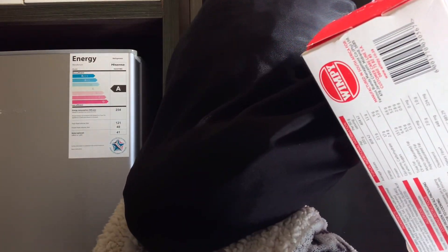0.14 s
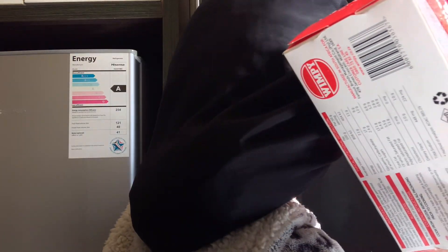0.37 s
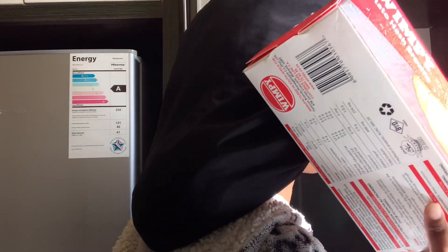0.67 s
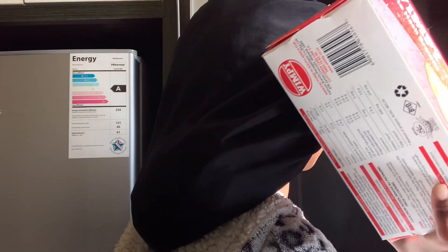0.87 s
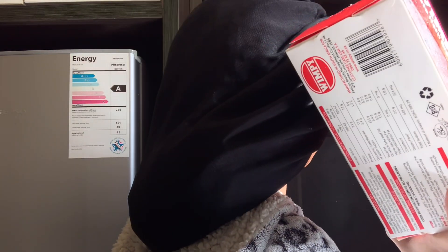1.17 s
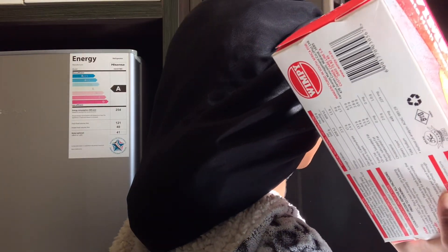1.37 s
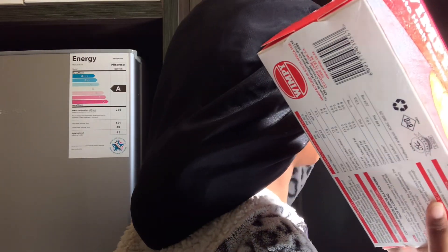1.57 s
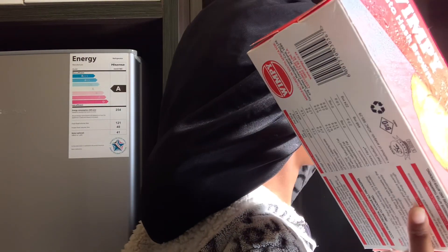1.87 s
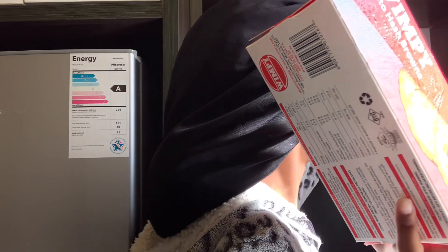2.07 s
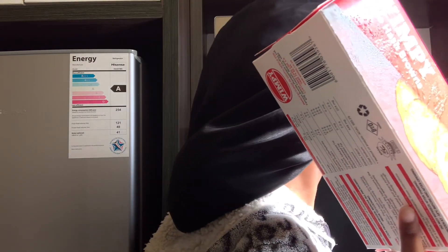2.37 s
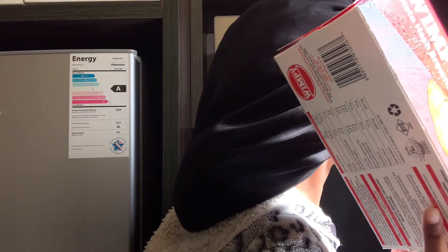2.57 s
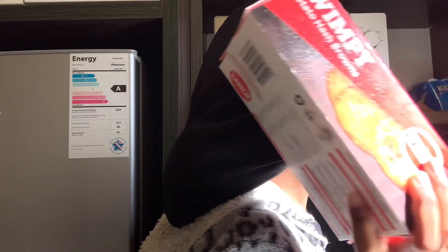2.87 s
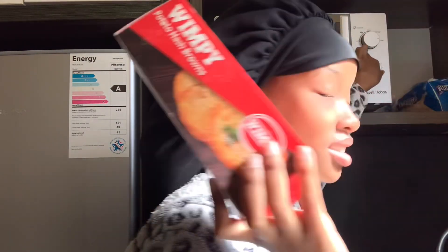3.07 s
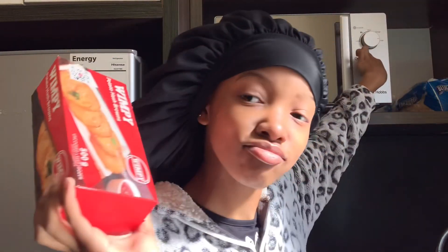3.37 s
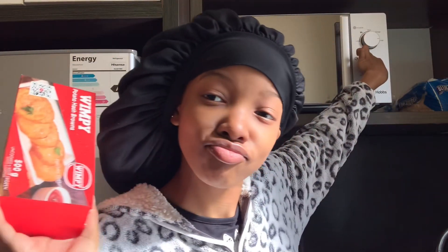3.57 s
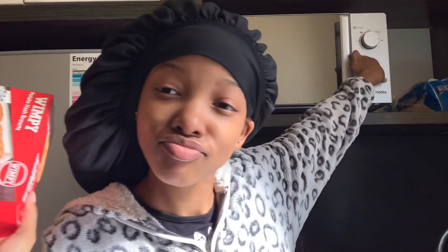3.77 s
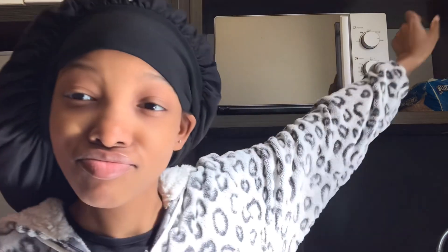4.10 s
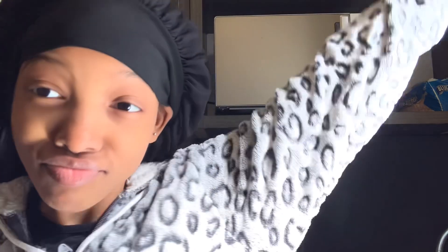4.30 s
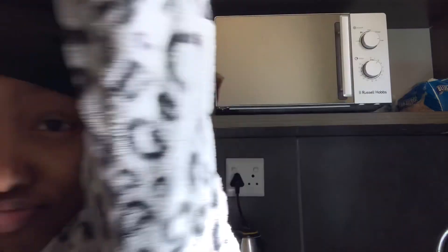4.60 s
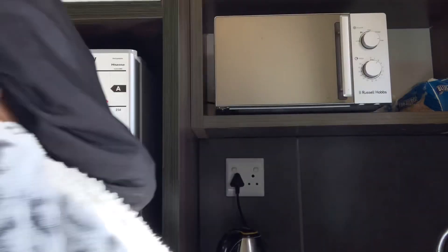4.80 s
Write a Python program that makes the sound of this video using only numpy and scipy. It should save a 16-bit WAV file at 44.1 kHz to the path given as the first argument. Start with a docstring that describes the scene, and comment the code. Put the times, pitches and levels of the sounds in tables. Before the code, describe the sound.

A dish clatters onto a microwave turntable, the door thuds shut with a boom, a dial clicks, and the oven starts humming steadily.

```python
"""A microwave oven in a hard-walled kitchen

A dish rattles onto the turntable and slides, the door's latch knocks and the door booms shut, the dial clicks:
each blow is a burst of reverberant noise plus decaying modes. At switch-on a surge shakes the case, then
the transformer hums and buzzes in steady partials while the fan's blade tone climbs through duct resonances.
A sleeve brushes near the microphone as shaped noise; a fridge drones in beating lines over still air.
"""
import sys
import numpy as np
from scipy import signal
from scipy.fft import rfft, irfft, next_fast_len
from scipy.io import wavfile

SR = 44100
rng = np.random.default_rng(int(sys.argv[2]) if len(sys.argv) > 2 else 0)


def waveform_to_disk(signal):
    """Save audio, clipped to [-1, 1], as 16-bit WAV at the path in sys.argv[1]."""
    frames = np.transpose(np.atleast_2d(signal))
    scaled = np.clip(frames, -1, 1) * 32767
    samples = np.round(scaled).astype(np.int16)
    wavfile.write(sys.argv[1], SR, samples)


N = 217986
TIME = np.arange(N) / SR  # s

# Blows: (time [s], clack level [dB], ring level [dB], clack tilt [dB/octave], favoured frequency [Hz])
# the dish lands and rocks
DISH_BLOWS = [(.367, -24, -11.5, 1.5, 795), (.385, -28, -22, -4, 446), (.443, -23.5, -32.5, -1, 1700),
              (.475, -23.5, -20.5, -5.5, 505), (.505, -41, -19, -5, 755), (.516, -25, -29, -1, 1060),
              (.527, -33.5, -19.5, -9, 540), (.924, -37, -66.5, -.5, 1700), (1.059, -53, -80, 0, 1680)]
# latch hooks, then the door on its frame: columns as for the dish
DOOR_BLOWS = [(1.654, -27.5, -40.5, -1, 700), (1.682, -25, -22, -1, 720), (1.703, -24, -27, 0.5, 262),
              (1.711, -20.5, -23, -0.5, 1170), (1.716, -18, -25.5, 1, 1900),
              (1.726, -18.5, -14.5, -1.5, 288), (1.741, -40.5, -25, -1, 470), (1.751, -26, -19, -1, 356),
              (1.774, -32, -20, 0.5, 478)]
# the timer dial: columns as for the dish
DIAL_BLOWS = [(2.127, -41, -34.5, -1.7, 1040), (2.164, -58.5, -53, -1.3, 2000),
              (2.200, -52.5, -37, -2.5, 1050), (4.281, -53, -57, 2, 2000)]
# the timer switch closing: columns as for the dish
SWITCH_BLOWS = [(2.398, -41.5, -24.5, -2, 805), (2.436, -48.5, -32.5, 0.5, 984)]

# Modes rung by a blow on the dish, the lowest being the case rocked as the dish lands: (frequency [Hz],
# relative level [dB], decay time T60 [s])
DISH_MODES = [(101.5, -7, 1.9), (219, -4.5, 1.3), (372, 0, 0.41), (382.3, -9, 0.86), (411.5, 2.5, 0.88),
              (530.5, 4, 0.35), (544.4, -1.5, 0.4), (573, -7, 0.9), (585, -19, 0.48), (688, -5.5, 0.39),
              (796, 2.5, 0.45), (788, -4, 0.79), (822, -4, 0.28), (1117, -18, 0.98), (1700, 1.5, 0.49),
              (1640, -22, 0.23), (2250, -20, 0.27), (3030, -14, 0.62), (3400, -14, 0.45), (5000, -27, .3)]
# modes of the door: (frequency [Hz], relative level [dB], decay time T60 [s])
DOOR_MODES = [(255, 1, 0.41), (290, 0, .45), (346, -24, 0.33), (366.7, 3, 0.65), (391.8, 2, 0.33),
              (410, -8.5, 0.59), (450, -2, .65), (473, 1.5, 0.27), (575, 1.5, 0.56), (586, -13.5, 0.93),
              (566, -15, 0.3), (740, -12, 0.19), (810, -21.5, 0.71), (860, -10.5, .36), (1173, -9, 0.89),
              (1370, -15.5, .35), (1610, -5.5, 0.21), (2340, -5, .27)]
# modes of the dial: (frequency [Hz], relative level [dB], decay time T60 [s])
DIAL_MODES = [(860, -10.5, .3), (1000, 0, 0.21), (1056, 6, 0.31), (2100, -7, 0.69)]
# modes of the switch: (frequency [Hz], relative level [dB], decay time T60 [s])
SWITCH_MODES = [(721, -7, 0.12), (766, -5.5, 0.14), (840, -6.5, 0.18), (870, -6.5, 0.27), (925, -9.5, 0.14),
                (1090, -7.5, 0.39)]

# Unpitched part of a blow on the dish: (frequency [Hz], relative density [dB per Hz])
DISH_CLACK = [(40, -28), (70, -21), (120, -4), (300, -6.5), (550, 9.5), (800, 7), (1150, 0), (2000, -1.5),
              (3100, -4), (4500, -11.5), (7000, -16.5), (11000, -21), (16000, -15.5)]
# unpitched part of a blow on the door: (frequency [Hz], relative density [dB per Hz])
DOOR_CLACK = [(25, -31.5), (55, 5), (150, 7), (350, 4.5), (600, 4), (1200, 3), (2200, -1), (3800, -5),
              (5500, -13), (7500, -20.5), (11000, -20), (16000, -17)]
# unpitched part of a blow on dial or switch: (frequency [Hz], relative density [dB per Hz])
DIAL_CLACK = [(60, 5.5), (400, -1.5), (1000, 6), (2200, -6.5), (5000, -19), (10000, -37.5), (16000, -26)]

# Close pairs of modes of case and cupboard: (mean frequency [Hz], split [Hz], level [dB], T60 [s])
BOOM_PAIRS = [(54.4, 11, -19, 0.54), (90.4, 10, -22, 1), (145.5, 6.9, -14.5, 1), (181.1, 5.75, -15, 1.0),
              (229, 9.4, -22, 0.58), (285.8, 7.5, -25, 0.64)]
# partials of the booming case: (frequency [Hz], relative level [dB], left-right difference [dB])
CASE_PARTIALS = [(138, 1, -3.5), (198, -20, 9), (102.4, -18.5, -4)]
# hum of the transformer core: (frequency [Hz], level [dB], left-right difference [dB])
MAINS_HUM = [(50.2, -58, -1), (100, -35, -4), (150.1, -55, 14), (200.1, -56, -10)]
# buzz of the core at its onset: (frequency [Hz], level [dB], left-right difference [dB])
CORE_BUZZ = [(298.3, -48.5, -7), (596.5, -56, -9)]
# resonances of the air duct: (frequency [Hz], width [Hz], level [dB])
DUCT_RESONANCES = [(188, 5.3, -50.5), (212.2, 6.4, -39.5)]
# air moved by the fan: (frequency [Hz], relative density [dB per Hz])
DRAUGHT_SPECTRUM = [(60, -16), (110, -12.5), (170, -3.5), (300, 2), (450, 0), (1100, -3), (1500, -12),
                    (2200, -12.5), (4000, -29.5), (7000, -34), (15000, -54)]

# Strokes of the sleeve: (time [s], length [s], level [dB], treble tilt [dB/octave])
SLEEVE_STROKES = [(3.03, .25, -57, 1.5), (3.76, .05, -66, 1), (4.151, .12, -68, 7), (4.264, .07, -51.5, 5),
                  (4.377, .08, -60.5, 3), (4.71, 0.11, -68.5, 3)]
# the one snap of the fleece: (time [s], level [dB])
FLEECE_SNAP = (3.999, -37.5)
# hiss of the fleece: (frequency [Hz], relative density [dB per Hz])
CLOTH_SPECTRUM = [(200, 5), (1000, -1.5), (3500, 6), (6500, -2), (10500, -14.5), (14500, -7.5), (16000, -3)]

# Fridge compressor: (frequency [Hz], level [dB], left-right difference [dB])
FRIDGE_LINES = [(61.1, -49, 0), (105, -58, -3), (122.3, -51, 3), (179.8, -54, 4), (183.6, -57, 7),
                (220.8, -60, 0), (348.6, -59, 6), (500.3, -58, -2), (631.8, -59, -8)]
# evenly spaced lines that beat as a fast throb: (frequency [Hz], relative level [dB], left-right [dB])
THROB_LINES = [(411.2, -57, 3), (426.35, -48.5, 0), (441.5, -49, 0), (456.65, -57, -3)]
# still air of the kitchen: (frequency [Hz], relative density [dB per Hz])
AIR_SPECTRUM = [(25, -11), (50, -8.5), (80, -9), (125, -4), (200, -9.5), (370, -10), (520, -16.5),
                (700, -14), (1150, -14.5), (1450, -21.5), (2200, -26.5), (3400, -32.5), (6700, -43.5),
                (11000, -62), (15500, -52)]

# Reflections from the walls of the oven's alcove: (delay [s], level [dB])
ALCOVE_ECHOES = [(.0017, -18), (.0039, -14.5), (.0062, -17), (.0094, -10.5)]
# reverberation of the kitchen: (frequency [Hz], decay time T60 [s])
ROOM_T60 = [(60, 0.77), (200, 1), (500, 0.66), (1000, 0.67), (2000, 0.61), (4000, 0.65), (7000, 0.54),
            (11000, 0.31), (16000, .3)]
# likeness of the sound at the two ports: (frequency [Hz], coherence [0 to 1])
COHERENCE = [(50, 0.94), (150, 0.62), (300, 0.35), (550, 0.091), (1000, 0.36), (3000, 0.035), (7000, 0.05),
             (12000, 0.38)]
# response of the microphone ports: (frequency [Hz], gain [dB])
MICROPHONE = [(20, -9.5), (32, -7.5), (45, -1), (6800, 1), (7700, -2), (8500, -32.5), (9400, -30.5),
              (10500, 1.5), (12000, 2.5), (16000, -5.5)]

LAG_S = 0.00035  # the left port hears later
SLAM_S, MAINS_ON_S, THROB_PEAK_S = 1.712, 2.41, 2.412
AIR_DB = -41.5
# lengths run from the onset to the start of the release
CHATTER_S, CHATTER_LENGTH_S, CHATTER_PER_S = .434, .14, 45
CHATTER_DB, CHATTER_SPREAD_DB, CHATTER_FADE_DB_PER_S, CHATTER_TILT_DB = -35, 3.5, 28, 0.6
SLIDE_S, SLIDE_RISE_S, SLIDE_LENGTH_S, SLIDE_FALL_S = 0.891, 0.02, 0.088, .035
SLIDE_DB, SLIDE_TILT_DB = -44, -1.9  # tilt per octave, as for chatter and snap
SURGE_S, SURGE_RISE_S, SURGE_LENGTH_S, SURGE_FALL_S = 2.399, 0.051, 0.085, 0.015
SURGE_DB, LINGER_DB, LINGER_T60_S = -16.5, -12, 0.65  # the lingering boom is relative to the surge
FAN_TOP_HZ, FAN_RUN_UP_S = 212.34, .83  # final blade tone, time constant of the run-up
STROKE_RISE_S, STROKE_FALL_S, SNAP_TILT_DB = .055, .065, 8
KNEE, CEILING = .6, .9  # amplitude where rounding starts, and its limit
EDGE_HZ = 15900  # upper band limit


def dish():
    """Impact and friction: blows excite the modes of the dish and rock the case, its rim chatters, its foot
    scrapes."""
    struck = blows(DISH_BLOWS, DISH_MODES, DISH_CLACK, crack_db=3.5, crack_s=0.0047, rise_s=0.0014, alike=0.56)
    return (struck + chatter() + slide()) * pan(db=-1.0)


def chatter():
    """Repeated impact: ticks of the rim follow unevenly and weaken as the dish settles."""
    out = np.zeros((2, N))
    ticks = []
    for _ in range(5):
        echoes = alcove(clack(crack_db=14, crack_s=.004))
        ticks.append(colour(echoes, DISH_CLACK, CHATTER_TILT_DB))
    for k, (early, size) in enumerate(rng.uniform(-1, 1, (16, 2))):
        after_s = (k + .3 * early) / CHATTER_PER_S
        if after_s < CHATTER_LENGTH_S:
            level_db = CHATTER_DB + CHATTER_SPREAD_DB * size - CHATTER_FADE_DB_PER_S * after_s
            add(out, CHATTER_S + after_s, amp(level_db) * ticks[k % len(ticks)])
    return out


def slide():
    """Sliding friction: the foot of the dish scrapes the glass as a short swell of broadband noise."""
    scrape = amp(SLIDE_DB) * colour(diffuse(N), DISH_CLACK, SLIDE_TILT_DB)
    return envelope(TIME - SLIDE_S, SLIDE_RISE_S, SLIDE_LENGTH_S, SLIDE_FALL_S) * scrape


def door():
    """Impact: latch hooks and frame ring the modes of the door."""
    struck = blows(DOOR_BLOWS, DOOR_MODES, DOOR_CLACK, crack_db=6, crack_s=0.0082, rise_s=0.0018, alike=0.23)
    return struck * pan(db=-1.0)


def slam_boom():
    """Coupled modes: energy passes to and fro within each pair, so the boom swells, dips and returns."""
    t = np.maximum(TIME - SLAM_S - np.array([[LAG_S], [0]]), 0)
    out = np.zeros((2, N))
    for hz, split_hz, db, t60 in BOOM_PAIRS:
        beat = np.sin(np.pi * split_hz * t)
        carrier = np.sin(2 * np.pi * hz * t)
        out += np.sqrt(2) * amp(db - 60 * t / t60) * beat * carrier
    return out


def dial():
    """Impact: the clicks of the timer dial ring a few modes."""
    struck = blows(DIAL_BLOWS, DIAL_MODES, DIAL_CLACK, crack_db=10.0, crack_s=.008, rise_s=0.0028, alike=0.86)
    return struck * pan(db=-7.0)


def switch():
    """Impact: the closing timer switch rings its own modes with a soft clack."""
    struck = blows(SWITCH_BLOWS, SWITCH_MODES, DIAL_CLACK,
                   crack_db=-10.5, crack_s=.008, rise_s=0.0026, alike=0.3)
    return struck * pan(db=-7.0)


def transformer(ease_db_per_s=4, rise_s=0.022):
    """Magnetic vibration: a surge shakes the case, then the core hums, strongest at twice the mains rate."""
    since_surge = TIME - SURGE_S
    surge = envelope(since_surge, SURGE_RISE_S, SURGE_LENGTH_S, SURGE_FALL_S)
    linger_fall_s = LINGER_T60_S / np.log(1000)  # T60 to exponential time constant
    # a weaker boom lingers in the cupboard
    linger = amp(LINGER_DB) * envelope(since_surge, SURGE_RISE_S, SURGE_LENGTH_S, linger_fall_s)
    case = tones(CASE_PARTIALS, start_s=2.8, waver_db=3.5, waver_hz=8)
    boom = amp(SURGE_DB) * np.maximum(surge, linger) * case
    since_s = np.maximum(TIME - MAINS_ON_S, 0)
    hum = tones(MAINS_HUM, MAINS_ON_S, waver_db=.6, waver_hz=2.5)
    # the buzz eases as the filament warms
    buzz = amp(-ease_db_per_s * since_s) * tones(CORE_BUZZ, MAINS_ON_S, waver_db=1.5, waver_hz=1.3)
    return boom + np.minimum(since_s / rise_s, 1) * (hum + buzz)


def fan(octave_db=-14, draught_db=-47):
    """Blade passage and resonance: the tone climbs with speed, swelling in the duct; the draught grows too."""
    speed = np.tanh(np.maximum(TIME - MAINS_ON_S, 0) / FAN_RUN_UP_S)  # fraction of full speed
    blade_hz = FAN_TOP_HZ * speed
    power = np.zeros(N)
    for hz, width_hz, db in DUCT_RESONANCES:
        power += amp(db) ** 2 / (1 + (2 * (blade_hz - hz) / width_hz) ** 2)
    gain = speed * np.sqrt(power)
    turn = 2 * np.pi * (np.cumsum(blade_hz) / SR - blade_hz * np.array([[LAG_S], [0]]))
    tone = np.sqrt(2) * gain * (np.sin(turn) + amp(octave_db) * np.sin(2 * turn))
    return tone + amp(draught_db) * speed * diffuse(N, DRAUGHT_SPECTRUM)


def sleeve(grain_db=1.0, snap_s=0.0018, direct=0.73):
    """Fibre friction: fleece hisses in uneven catches and snaps once; being near, both ports share much."""
    out, t = np.zeros((2, N)), TIME[:SR]
    for s, length_s, db, tilt_db in SLEEVE_STROKES:
        noise = evened(diffuse(SR) + direct * diffuse(SR)[0])
        hiss = colour(noise, CLOTH_SPECTRUM, tilt_db)
        add(out, s, amp(db) * envelope(t, STROKE_RISE_S, length_s, STROKE_FALL_S) * hiss)
    s, db = FLEECE_SNAP
    snap = colour(diffuse(SR), CLOTH_SPECTRUM, SNAP_TILT_DB)  # mostly top treble
    add(out, s, amp(db) * np.exp(-t / snap_s) * snap)
    return out * amp(grain_db * drift(hz=70))


def fridge(throb_db=-0.1):
    """Beating: the compressor drones in steady lines, and evenly spaced lines sum to a fast throb."""
    drone = tones(FRIDGE_LINES, start_s=0, waver_db=3.0, waver_hz=3)
    throb = amp(throb_db) * tones(THROB_LINES, THROB_PEAK_S, waver_db=2.5, waver_hz=1.81)
    return drone + throb


def still_air():
    """Diffuse field: steady coloured noise of the quiet kitchen."""
    return amp(AIR_DB) * diffuse(N, AIR_SPECTRUM)


def blows(rows, modes, spectrum, crack_db, crack_s, rise_s, alike):
    """Modal impact: each blow clacks and rings the same modes; blows share part of their echo pattern."""
    out = np.zeros((2, N))
    shared = clack(crack_db, crack_s)
    alike = np.clip(alike, 0, 1)
    for s, clack_db, ring_db, tilt_db, focus_hz in rows:
        own = clack(crack_db, crack_s)
        echoes = alcove(np.sqrt(alike) * shared + np.sqrt(1 - alike) * own)
        noise = amp(clack_db) * colour(echoes, spectrum, tilt_db)
        add(out, s, noise + amp(ring_db) * ring(modes, rise_s, focus_hz))
    return out


def ring(modes, rise_s, focus_hz, octaves=0.34, elsewhere=0.2, scatter=0.65):
    """Modal decay: modes near the favoured frequency ring hardest; phases scatter from blow to blow."""
    t, out = TIME[:SR], np.zeros((2, SR))
    hz, db, t60 = np.transpose(modes)
    sizes = amp(db) * (elsewhere + np.exp(-(np.log2(hz / focus_hz) / octaves) ** 2))
    for f, size, decay_s in zip(hz, sizes / np.linalg.norm(sizes), t60):
        phase = scatter * (1 - read(COHERENCE, f)) * rng.standard_normal((2, 1))
        wave = np.sin(2 * np.pi * f * (t - [[LAG_S], [0]]) + phase)
        out += size * amp(-60 * t / decay_s) * wave
    return out * (1 - np.exp(-t / rise_s))


def clack(crack_db, crack_s, swell_s=0.0024):
    """Reverberation: a burst swells off the nearest walls, then each band of the tail decays at its own T60."""
    t = TIME[:SR]
    hz, frame_s, bands = signal.stft(diffuse(SR), SR, nperseg=512)
    decay = amp(-60 * frame_s / read(ROOM_T60, hz)[:, None])
    tail = signal.istft(bands * decay, SR, nperseg=512)[1][:, :SR]
    burst = 1 + amp(crack_db) * np.exp(-t / crack_s)
    return tail * burst * (1 - np.exp(-t / swell_s))


def alcove(x):
    """Comb filtering: a few strong early reflections cut the sound into uneven bands."""
    out = x.copy()
    for delay_s, db in ALCOVE_ECHOES:
        add(out, delay_s, amp(db) * x)
    return out / np.sqrt(1 + sum(amp(db) ** 2 for _, db in ALCOVE_ECHOES))


def tones(lines, start_s, waver_db, waver_hz):
    """Superposition: steady lines, in step at start_s, each wavering slowly and at random in level."""
    t = TIME - start_s - np.array([[LAG_S], [0]])
    out = np.zeros((2, N))
    for hz, db, side_db in lines:
        gain = np.sqrt(2) * amp(db + waver_db * drift(waver_hz))
        out += gain * pan(side_db) * np.cos(2 * np.pi * hz * t)
    return out


def diffuse(size, spectrum=((20, 0), (20000, 0))):
    """Spatial coherence: noise at two ports, alike in the bass and mostly independent above."""
    hz = np.fft.rfftfreq(size, 1 / SR)
    right, other = rfft(rng.standard_normal((2, size)))
    same = np.clip(read(COHERENCE, hz), 0, 1)
    lag_s = LAG_S * (hz < 8000)
    left = same * right * np.exp(-2j * np.pi * hz * lag_s) + np.sqrt(1 - same ** 2) * other
    return evened(irfft(np.array([left, right]) * amp(read(spectrum, hz)), size))


def colour(x, spectrum, tilt_db=0, size=4096):
    """Minimum phase: a causal filter of unit energy, tilted about 1 kHz, the tilt level below 300 Hz."""
    hz = abs(np.fft.fftfreq(size, 1 / SR))
    tilt = tilt_db * np.log2(np.maximum(hz, 300) / 1000)
    gain = amp(read(spectrum, hz) + tilt)
    # the Hilbert transform of the log gain gives the phase
    response = np.exp(np.conj(signal.hilbert(np.log(evened(gain)))))
    taps = np.fft.ifft(response).real[:size // 2]
    return signal.oaconvolve(x, taps[None], axes=1)[:, :x.shape[1]]


def drift(hz):
    """Random modulation: a sum of slow sines of rms 1, up to the given rate."""
    t = TIME[::64]
    rates = np.geomspace(hz / 10, hz, num=12)
    wander = sum(np.sin(2 * np.pi * (f * t + rng.random())) for f in rates)
    return np.interp(TIME, t, evened(wander))


def envelope(t, rise_s, length_s, fall_s):
    """Growth and decay: straight attack, hold until length_s, exponential release."""
    return np.clip(t / rise_s, 0, 1) * np.exp(-np.maximum(t - length_s, 0) / fall_s)


def pan(db):
    """Level difference: gains of the left and right ports."""
    return amp(np.array([[db / 2], [-db / 2]]))


def add(mix, s, sound):
    """Superposition: adds a stereo sound into the mix at time s."""
    part = mix[:, round(s * SR):][:, :sound.shape[1]]
    part += sound[:, :part.shape[1]]


def read(points, hz):
    """Interpolation: reads a spectrum table on a log-frequency axis."""
    f, value = np.transpose(points)
    return np.interp(np.log(hz + 1), np.log(f + 1), value)


def evened(x):
    """Normalisation: scales to rms 1."""
    return x / np.sqrt(np.mean(x ** 2) + 1e-20)


def amp(db):
    """Logarithmic level: decibels to amplitude gain."""
    return 10 ** (np.asarray(db) / 20)


def scene():
    """Superposition: the oven's sounds, the sleeve, the fridge and the air add linearly."""
    knocks = dish() + door() + slam_boom() + dial() + switch()
    return knocks + transformer() + fan() + sleeve() + fridge() + still_air()


def record(dry):
    """Transduction: the ports lose deep bass and a treble notch, peaks are rounded, the band is limited."""
    size = 2 * next_fast_len(N)
    faded = dry * np.minimum(TIME / .004, 1)
    response = amp(read(MICROPHONE, np.fft.rfftfreq(size, 1 / SR)))
    heard = irfft(rfft(faded, size) * response, size)[:, :N]
    linear = np.clip(heard, -KNEE, KNEE)
    rounded = linear + (CEILING - KNEE) * np.tanh((heard - linear) / (CEILING - KNEE))
    lowpass = signal.firwin(511, EDGE_HZ, window=("kaiser", 9), fs=SR)
    return signal.oaconvolve(rounded, lowpass[None], "same")


dry = scene()
out = record(dry)
waveform_to_disk(out)
```